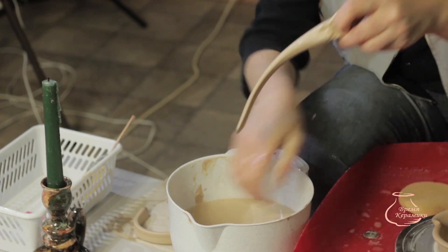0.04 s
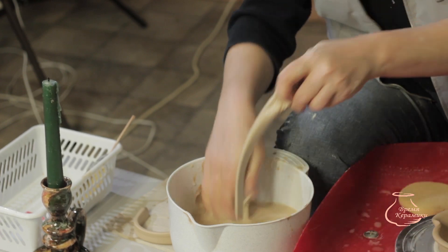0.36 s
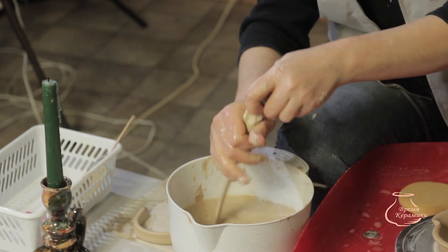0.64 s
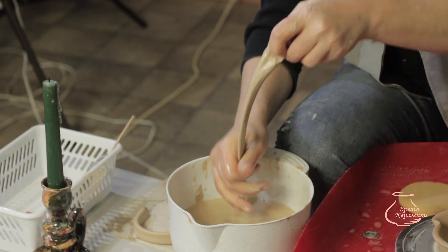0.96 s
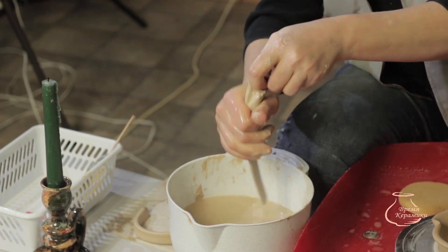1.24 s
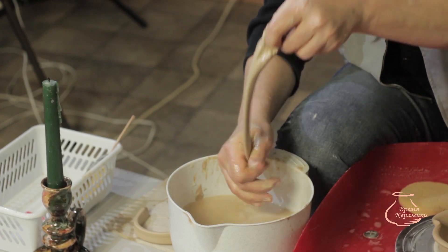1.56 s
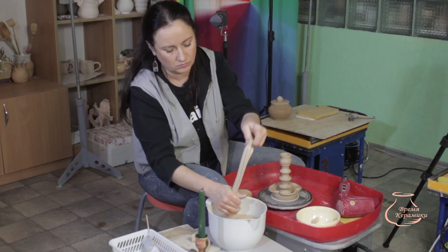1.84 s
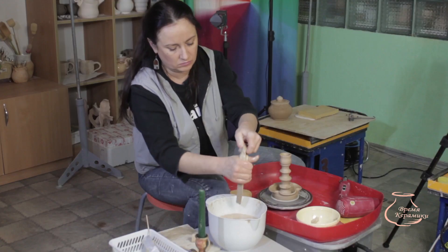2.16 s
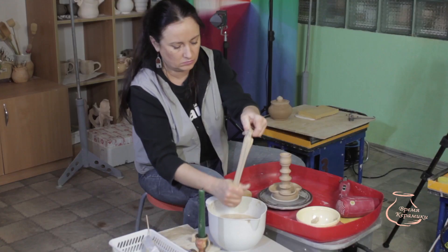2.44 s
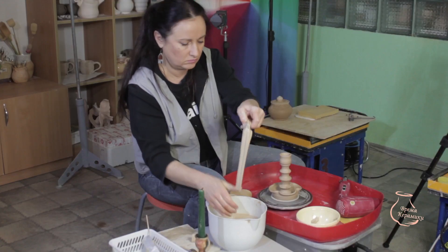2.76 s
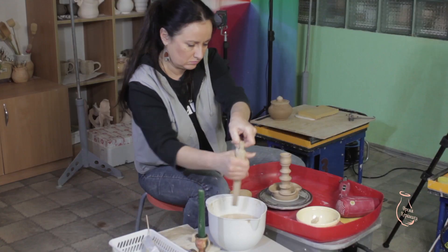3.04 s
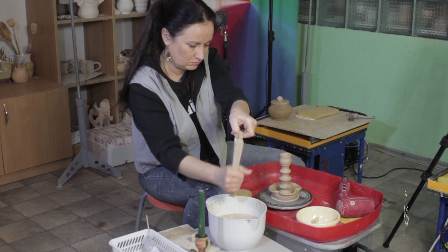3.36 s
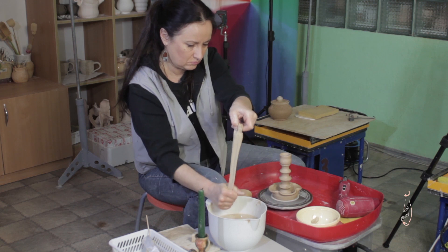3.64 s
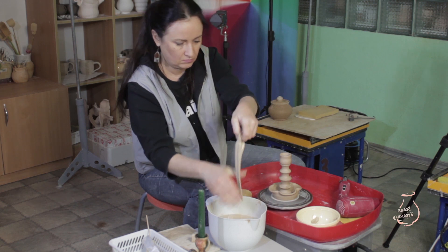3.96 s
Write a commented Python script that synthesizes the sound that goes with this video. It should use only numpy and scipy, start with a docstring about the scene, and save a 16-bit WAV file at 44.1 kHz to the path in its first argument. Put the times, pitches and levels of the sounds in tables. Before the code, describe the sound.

Water splashes lightly as a hand and a wooden tool dip into a plastic bucket, knocking it. Drops plink back, then wet fingers wipe the tool and softly slap the water, close by in a quiet, humming studio.

```python
"""A quiet pottery studio, the stereo microphone close to a plastic bucket of clay water. Room air, mains
hum and a soft regular throb, probably the turning wheel, lie under it all. In the first second a wet hand
and a wooden tool dip in and knock the bucket over a low rumble; drops fall back and ring as bubbles.
Then wet fingers wipe along the tool among stray drips, and from about two seconds on the hand also
slaps the water softly."""
import sys
import numpy as np
from scipy import signal
from scipy.fft import rfft, irfft
from scipy.io import wavfile
from scipy.ndimage import uniform_filter1d

SR = 44100
rng = np.random.default_rng(int(sys.argv[2]) if len(sys.argv) > 2 else 0)


def materialize(psi):
    """Save the field psi as 16-bit PCM at rate SR to the path in sys.argv[1].

    A 1-D psi becomes a single channel; in a 2-D psi each row is a channel.
    """
    bounded = np.clip(np.atleast_2d(psi).T, -1, 1)
    quanta = np.round(bounded * 32767).astype(np.int16)
    wavfile.write(sys.argv[1], SR, quanta)


N = 176400
TIME, FREQ = np.arange(N) / SR, np.fft.rfftfreq(N, 1 / SR)


def amp(db):
    """Decibels to gain."""
    return 10 ** (np.asarray(db) / 20)


def unit(x):
    """Scales to rms 1."""
    return x / np.sqrt(np.mean(x ** 2) + 1e-20)


def read(points, hz):
    """Reads a table on a log-frequency axis."""
    f, value = np.transpose(points)
    return np.interp(np.log(hz + 1), np.log(f + 1), value)


def add(mix, start, sound):
    """Mixes a sound in at a time in seconds."""
    part = mix[max(round(start * SR), 0):][:len(sound)]
    part += sound[:len(part)]


def pair(a, b, likeness):
    """Two channels of given likeness from two unrelated signals."""
    c = np.clip(likeness, -1, 1)
    mid, side = a * np.sqrt((1 + c) / 2), b * np.sqrt((1 - c) / 2)
    return np.array([mid + side, mid - side])


def colour(x, points, size=4096):
    """Causal filter that follows a table of (frequency [Hz], gain [dB])."""
    log_gain = np.log(amp(read(points, abs(np.fft.fftfreq(size, 1 / SR)))))
    taps = np.fft.ifft(np.exp(np.conj(signal.hilbert(log_gain)))).real
    return signal.fftconvolve(x, taps[:size // 2])


def whiten(x, size=40):
    """Evens out the chance colour of a short burst."""
    power = uniform_filter1d(abs(rfft(x)) ** 2, size)
    return colour(x, np.c_[np.fft.rfftfreq(len(x), 1 / SR), -10 * np.log10(abs(power) + 1e-12)])


def band(x, hz, octaves):
    """A bell-shaped band that keeps the power of white noise."""
    bell = np.exp(-.5 * (np.log2((FREQ + 1) / hz) / octaves) ** 2) * np.sqrt(hz / (FREQ + hz))
    return irfft(rfft(x) * unit(bell), N)


def swell(start, rise, fall):
    """A smooth rise and an exponential fall."""
    t = TIME - start
    return np.sin(np.pi / 2 * np.clip(t / rise, 0, 1)) * np.exp(-np.maximum(t - rise, 0) / fall)


def room_air(level_db=-50.5):
    """The studio's steady room tone, heaviest in the bass."""
    # spectrum of the air: (frequency [Hz], relative density [dB])
    shape = [(15, -22.5), (25, -2.5), (48, -4.5), (70, -16.5), (108, -15.5), (127, -17), (390, -29.5),
             (531, -32), (1300, -37), (1840, -39), (16000, -48)]
    # stereo image: (frequency [Hz], left-right correlation)
    likeness = [(30, 0.22), (70, 0.4), (130, -0.14), (300, 0.28), (4000, 0.21), (12000, 0.12)]
    # the bass leans right: (frequency [Hz], gain added left and taken off right [dB])
    balance = [(40, -1.2), (100, -2), (200, 0)]
    spectrum = pair(*rfft(rng.standard_normal((2, N))), read(likeness, FREQ)) * amp(read(shape, FREQ))
    spectrum *= amp(np.outer([1, -1], read(balance, FREQ)))
    return amp(level_db) * unit(irfft(spectrum, N))


def mains_hum():
    """Two steady mains harmonics, one radian apart between left and right."""
    # harmonics: (frequency [Hz], rms level [dB])
    partials = [(100, -64), (200, -74.5)]
    offset = np.array([[0], [1]])
    return sum(amp(db) * np.sqrt(2) * np.sin(2 * np.pi * (hz * TIME + rng.random()) + offset)
               for hz, db in partials)


def wheel_throb(beat_at_s=2.171, period_s=.1722, width_s=.015, level_db=-41.5):
    """A soft, regular push of pressure, probably from the turning wheel."""
    from_beat = (TIME - beat_at_s + period_s / 2) % period_s - period_s / 2
    push = np.exp(-.5 * (from_beat / width_s) ** 2)
    return amp(level_db) * (push.mean() - push)


def rumble(centre_hz=40.66, wander_hz=7.4):
    """A deep boom of wandering pitch swells with the first movements."""
    # course of the boom: (time [s], level [dB])
    levels = [(0, -43.5), (.04, -41), (.14, -41.5), (.28, -54), (.38, -51), (.48, -38.5), (.6, -49),
              (.74, -60), (.94, -45.5), (1.15, -70), (4, -78)]
    wander = unit(irfft(rfft(rng.standard_normal(N)) * (FREQ < 20), N))
    boom = np.sqrt(2) * np.sin(2 * np.pi * np.cumsum(centre_hz + wander_hz * wander) / SR)
    return boom * amp(np.interp(TIME, *np.transpose(levels)))


def room_reflections(x, tail_db=-3, gap_s=.0017, wall_dull_hz=11500, echo_dull_hz=7000, size=256):
    """Dulled early echoes off nearby things, and a short tail from the walls, longest in the bass."""
    # decay of the studio: (frequency [Hz], t60 [s])
    decay = [(200, 0.75), (700, 0.33), (1500, 0.32), (3500, 0.35), (8000, 0.34), (14000, 0.58)]
    # stereo image of the tail: (frequency [Hz], left-right correlation)
    likeness = [(200, 0.63), (1000, 0.66), (4000, 0.55), (10000, 0.046)]
    # early echoes: (delay [s], gain [dB])
    echoes = [(.008, -15), (0.0116, -16.5)]
    hz, t, bins = signal.stft(rng.standard_normal((2, SR)), SR, nperseg=size)
    hz = hz[:, None]
    bins = pair(*bins, read(likeness, hz)) / (1 + (hz / wall_dull_hz) ** 2)
    response = signal.istft(bins * amp(-60 * t / read(decay, hz)), SR, nperseg=size)[1]
    response *= np.clip(TIME[:response.shape[1]] / gap_s - 1, 0, 1)
    response *= amp(tail_db) * np.sqrt(2 * np.log(1000) / (read(decay, 970) * SR))  # midrange energy
    smear = np.exp(-2 * np.pi * echo_dull_hz * TIME[:size])
    for side in response:
        for delay, db in echoes:
            add(side, delay * rng.uniform(.99, 1.01), amp(db) * smear / smear.sum())
    return signal.fftconvolve(x[None], response, axes=1)[:, :N]


def wet_noise(size=32, grain_db=4.5):
    """Noise that comes in tiny clumps, like a film of slip tearing."""
    clumps = np.repeat(rng.standard_normal(N // size + 1), size)[:N]
    return unit(rng.standard_normal(N) * amp(grain_db * clumps))


def hand_slaps(rise_s=.011, fall_s=.03, snap_db=21.5):
    """The hand meets the water, heard from further off: a small snap, then a diffuse splash."""
    # slaps: (time [s], level [dB], centre [Hz], width [octaves])
    slaps = [(1.981, -63.5, 860, 1.15), (2.682, -62.5, 463, 1), (2.9383, -53.5, 1950, 1.16),
             (3.856, -60.5, 700, 1.7)]
    out = np.zeros(N)
    for start, db, hz, width in slaps:
        splash = wet_noise() * swell(start, rise_s, fall_s)
        add(splash, start, amp(snap_db) * np.ones(2))
        out += amp(db) * band(splash, hz, width)
    return out


def finger_strokes():
    """Wet fingers slide over the tool and stir the water."""
    # wipes and sloshes: (start [s], rise [s], fall [s], level [dB], centre [Hz], width [octaves])
    strokes = [(0.12, 0.018, 0.021, -47, 222, 0.41), (0.288, 0.021, 0.14, -58, 900, 12),
               (0.526, 0.0064, 0.0059, -48, 11900, 0.42), (0.527, 0.0035, 0.18, -63, 3520, 1.5),
               (1.24, 0.1, 0.25, -69.5, 3520, 2.1), (1.56, 0.017, 0.06, -67, 6050, 1.6),
               (1.31, 0.03, 0.05, -68, 324, 0.77), (2.26, 0.017, 0.12, -63.5, 6800, 0.83),
               (2.33, 0.12, 0.027, -62.5, 7040, 1.8), (2.42, 0.057, 0.017, -68, 1380, 0.55),
               (3.12, 0.12, 0.18, -65, 6440, 3.4), (3.17, .16, 0.26, -65.5, 1420, 1.5),
               (3.422, 0.027, 0.035, -62.5, 560, 0.72), (3.78, 0.0059, 0.052, -60, 5040, 1.13),
               (3.85, 0.11, 0.3, -66.5, 1890, 2.9)]
    return sum(amp(db) * swell(start, rise, fall) * band(wet_noise(), hz, width)
               for start, rise, fall, db, hz, width in strokes)


def drops_and_bucket_ring(wobble_share=.04, taper=.7, spatter_s=.0039, spatter_grain=2.2, size=3000):
    """Spatters, each with a ring that swells, wobbles upward in pitch and quickly dies."""
    # bubbles trapped by drops; the last row is a short ring of the bucket as the hand slaps the water:
    # (time [s], pitch [Hz], time to peak [s], pitch rise [share per time to peak], ring [dB], spatter [dB])
    rings = [(.1529, 1078, 0.00096, 0.023, -27.5, -65), (0.5965, 835, 0.0026, 0.014, -47.5, -70),
             (0.6255, 3270, 0.00097, 0.018, -25.5, -57), (0.784, 1423, 0.0016, .05, -38.5, -56),
             (.7910, 1804, 0.0038, 0.067, -45, -55), (.7956, 8100, 0.00033, 0.013, -35.5, -43),
             (.888, 9300, 0.0004, .01, -49.5, -64), (0.894, 5200, 0.00081, .025, -47.5, -56),
             (.957, 993, 0.0025, 0.014, -50, -54), (1.360, 14300, 0.00032, .005, -49, -62),
             (1.582, 2470, 0.00048, .02, -52, -54), (1.630, 12400, 0.00018, .01, -51, -60),
             (2.260, 2680, 0.006, 0.0156, -61, -58), (2.940, 873, 0.0047, 0.014, -57, -64)]
    t, out = TIME[:size], np.zeros(N)
    for start, hz, peak_s, rise, ring_db, spatter_db in rings:
        age = t / peak_s
        grit, jitter = rng.standard_normal((2, size))
        wobble = wobble_share * unit(uniform_filter1d(jitter, 40))
        pitch = hz * (1 + rise * np.minimum(age, 10) + wobble)
        ring = (age * np.exp(1 - age)) ** taper * np.sin(2 * np.pi * np.cumsum(pitch) / SR)
        spatter = unit(np.sign(grit) * abs(grit) ** spatter_grain) * np.exp(-t / spatter_s)
        add(out, start, amp(ring_db) * ring + amp(spatter_db) * spatter)
    return out


def bucket_knocks(scuff_grain=.85, size=6000):
    """Close to the microphone, a blow and a short wet scuff ring the modes of the plastic bucket."""
    # modes of the bucket: (frequency [Hz], resonance gain [dB], t60 [s])
    modes = [(250, 7, 0.01), (581, 5.5, 0.045), (690, 2.5, 0.02), (885, -2, 0.019), (1200, 6, 0.045),
             (1500, -8, 0.0074), (1920, -5.5, 0.0077), (3440, -1.5, 0.011), (3770, -6, 0.008),
             (4600, -3.5, 0.0033), (5880, -5, 0.0011), (8450, -4.5, 0.0014), (11000, -3.5, 0.0038),
             (14900, -14, 0.0024)]
    # knocks: (time [s], scuff decay [s], scuff share [0-1], then strength [dB] at each of strength_hz)
    knocks = [(0.1193, 0.0023, 0.8, -13, -14, -7, -13.5, -25),
              (0.1518, 0.0013, 0.87, -7, -6.5, -5, -8.5, -25.5),
              (0.3065, 0.0012, 0.5, -15, -17, -21.5, -25, -42),
              (0.3327, 0.0013, 0.93, -8, -12, -14, -20, -32.5), (0.3886, .002, 1, -39, -27, -25, -25, -40),
              (0.6127, 0.00084, 0.21, -33, -0.5, -5, -21, -45),
              (0.6243, 0.0016, 0.37, -37, -13, -19, 4, -13),
              (.6272, .0012, 0.46, -23, -8.5, -1.5, -34, -10),
              (0.9568, 0.0017, 1, -33, -41, -14, -27.5, -26)]
    # points along a knock's spectrum: (frequency [Hz])
    strength_hz = (250, 600, 1200, 4000, 13000)
    t, out = TIME[:size], np.zeros(N)
    body = sum(amp(db - 60 * t / t60) * 2 * np.log(1000) / (t60 * SR) * np.cos(2 * np.pi * hz * t)
               for hz, db, t60 in modes)
    for start, scuff_s, share, *strength_db in knocks:
        grit = rng.standard_normal(size)
        scuff = np.sign(grit) * abs(grit) ** scuff_grain * np.exp(-t / scuff_s)
        force = np.sqrt(share) * scuff / np.linalg.norm(scuff)
        force[0] += np.sqrt(1 - share)  # the blow
        ring = signal.fftconvolve(whiten(force), body)
        add(out, start, colour(ring, list(zip(strength_hz, strength_db))))
    return out


def scene(left_lag_s=1.6e-5, soft_room_db=2.5):
    """The bucket stands a little off centre; strokes and slaps carry more room than knocks and drops."""
    near = bucket_knocks() + drops_and_bucket_ring()
    soft = finger_strokes() + hand_slaps()
    delayed = irfft(rfft(near + soft) * np.exp(-2j * np.pi * FREQ * left_lag_s), N)
    direct = np.array([delayed, near + soft]) * amp([[1], [-1]])  # louder on the left
    reflected = room_reflections(near + amp(soft_room_db) * soft)
    background = room_air() + mains_hum()
    low_end = (rumble() + wheel_throb()) * amp([[-2], [2]])  # louder on the right
    return direct + reflected + background + low_end


def record(dry, edge_hz=15850):
    """The treble is lifted slightly and the very top is softened; a steep band limit follows."""
    # treble colour: (frequency [Hz], gain [dB])
    treble_shape = [(10000, 0.5), (13000, 1.5), (16000, -4)]
    heard = np.array([colour(side, treble_shape)[:N] for side in dry])
    band_limit = signal.firwin(401, edge_hz, window=("kaiser", 8), fs=SR)
    return signal.oaconvolve(heard, band_limit[None], "same")


dry = scene()
out = record(dry)
materialize(out)
```